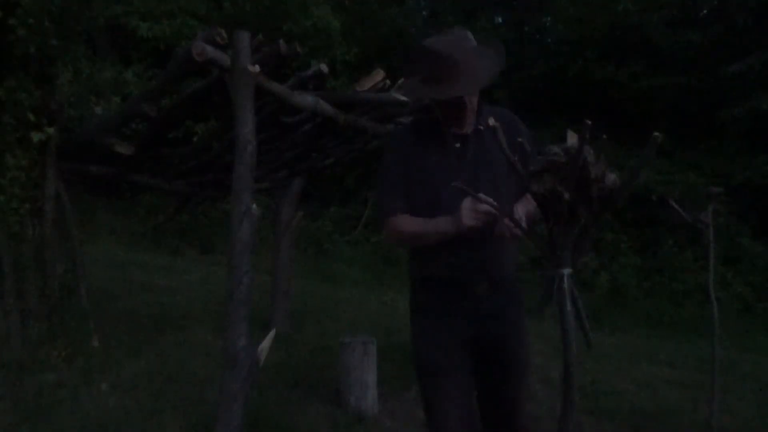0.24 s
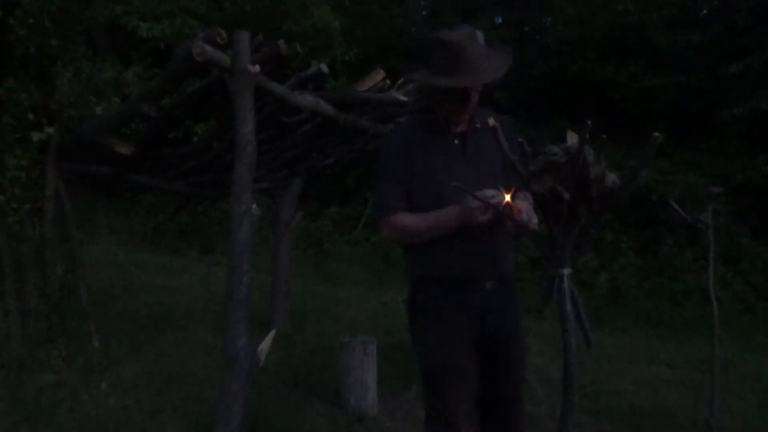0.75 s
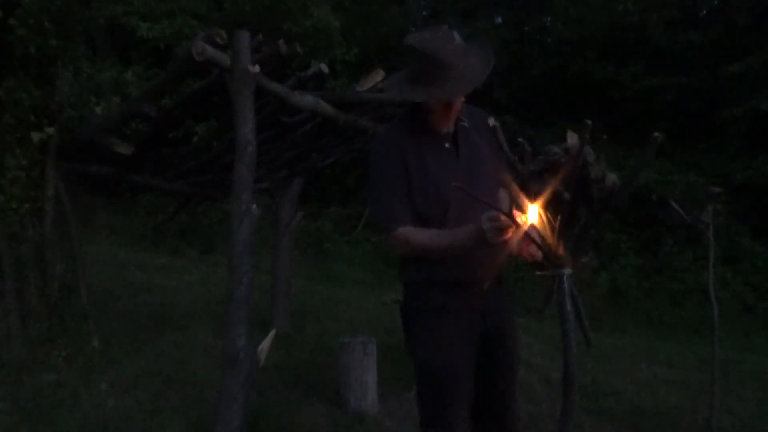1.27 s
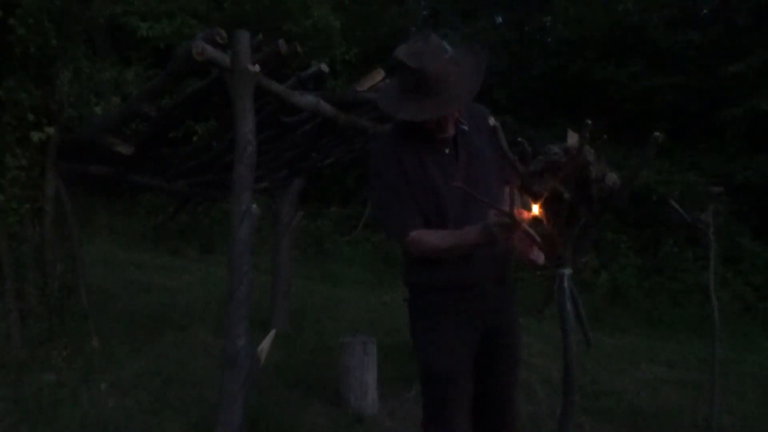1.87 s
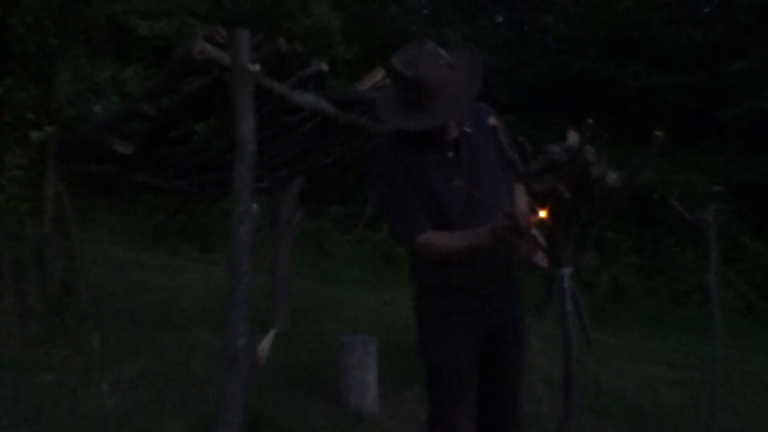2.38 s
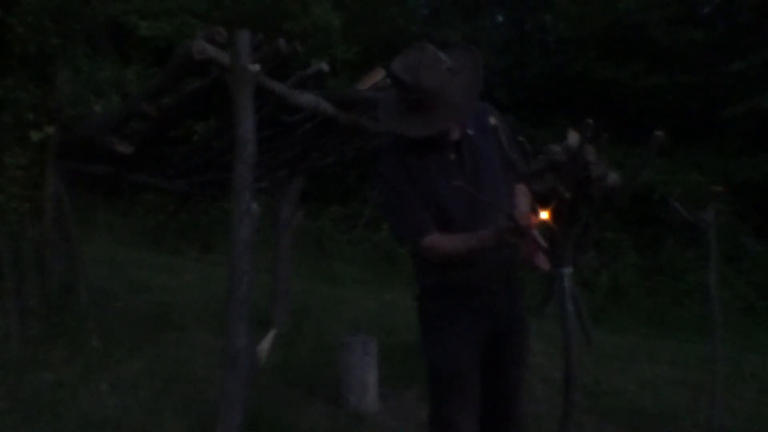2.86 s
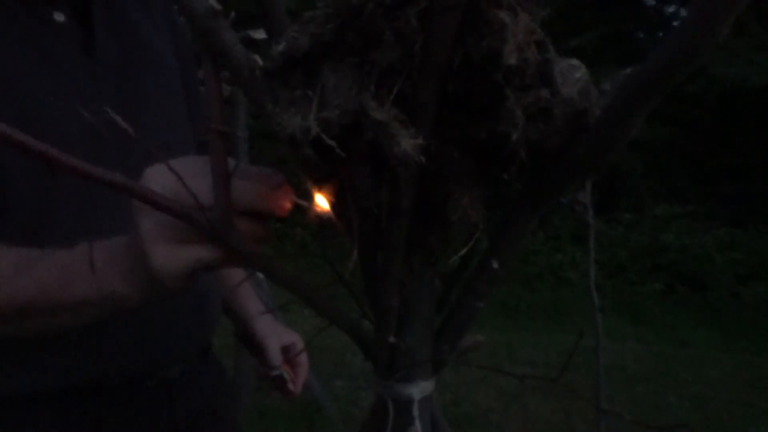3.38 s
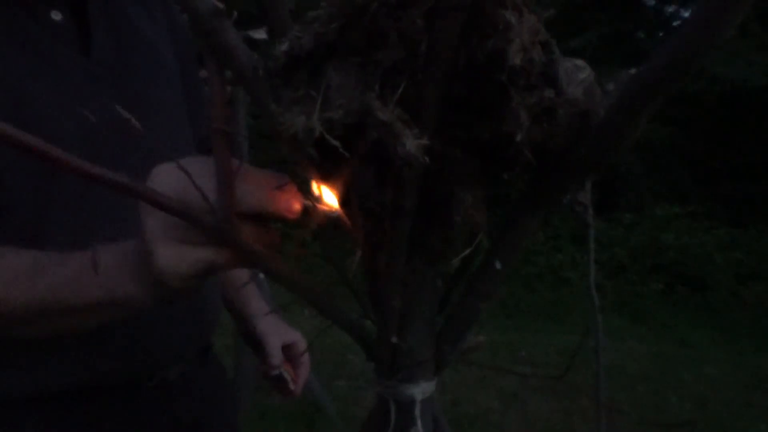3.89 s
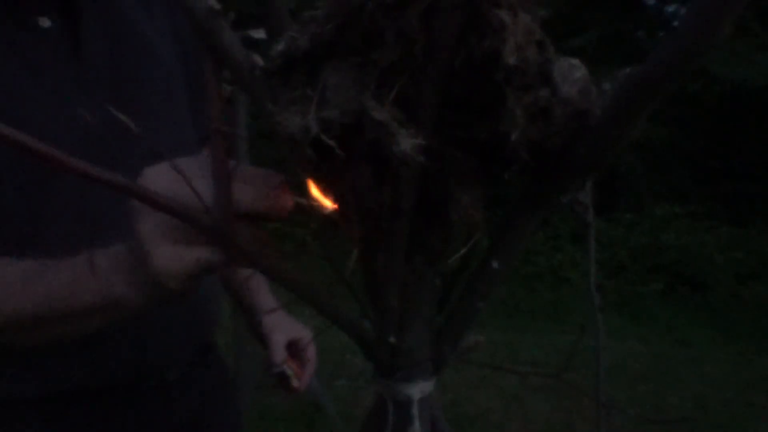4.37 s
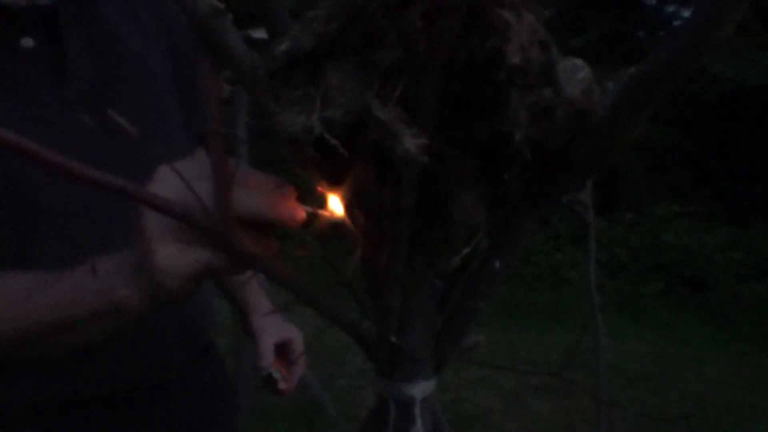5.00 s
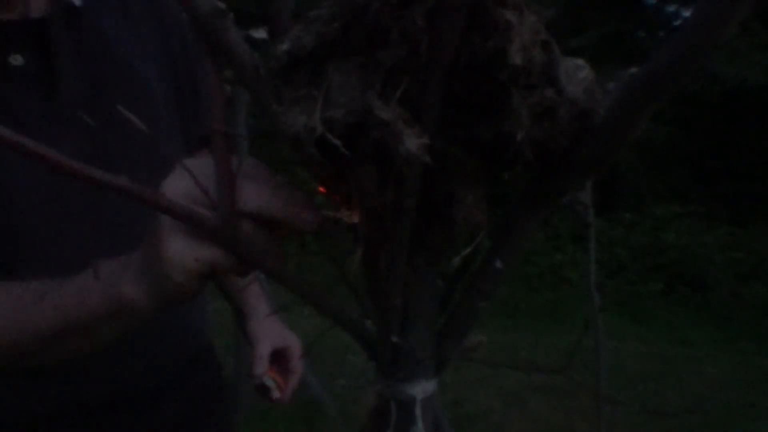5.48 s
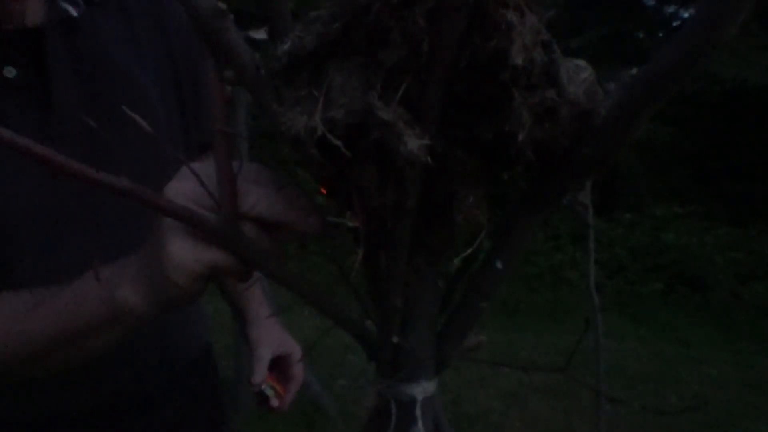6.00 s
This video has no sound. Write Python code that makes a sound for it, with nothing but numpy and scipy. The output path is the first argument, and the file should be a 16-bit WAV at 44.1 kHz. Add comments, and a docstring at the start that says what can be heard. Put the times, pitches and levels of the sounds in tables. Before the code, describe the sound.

A dry, hissing scrape and tiny ticks lead to a quick gritty match strike under a second in, followed by a short fizzing flare and fine crackle. Katydids rasp in quick paired strokes, a cricket chirps and a thin trill hangs very high. Near four seconds, sharp bright twig snaps come in two clusters. Distant birds call faintly over soft traffic and leaf hush. Close handling sounds sit slightly left, insects around.

```python
"""Dusk in a wooded garden, over a hush of far traffic and leaves (shaped noise) with wavering narrow bands.
A match scrapes, catches and flares (gritty noise, bursts ringing a box); dry twigs tick, snap and scuff (pulses
and rubs in resonances). Katydids rasp in paired strokes (tooth clicks in wing resonances), a meadow insect trills
high (beating tones), a tree cricket chirps (tone pulses), something ticks evenly (struck resonances) and far
birds call (gliding tones smeared by trees); a far engine drones very faintly (low narrow-band noise)."""
import sys
import numpy as np
from scipy import signal
from scipy.fft import rfft, irfft
from scipy.io import wavfile
from scipy.ndimage import uniform_filter1d

SR = 44100
rng = np.random.default_rng(int(sys.argv[2]) if len(sys.argv) > 2 else 0)


def log_audio(samples):
    """Write samples as a 16-bit WAV file to the path given in sys.argv[1]."""
    # one column per channel
    frames = np.atleast_2d(samples).T
    # limit to full scale, then quantise
    limited = np.clip(frames, -1, 1)
    pcm = np.round(limited * 32767).astype(np.int16)
    wavfile.write(sys.argv[1], SR, pcm)


N = 275625
T = np.arange(N) / SR

# slow swell of the distant traffic: time_s, swell_db
HUSH_SWELL = [(0, 3.5), (1.5, 2.5), (2.9, 2.5), (3.05, 3.5), (4.5, 3.5), (5.5, 2.5), (6.25, 3)]


def undb(db):
    """Amplitude ratio: 20 dB is a factor of ten."""
    return 10 ** (np.asarray(db) / 20)


def unit(x):
    """Normalization to an RMS of 1."""
    return x / np.sqrt(np.mean(x ** 2))


def curve(rows):
    """Linear interpolation of (time, value) rows at every sample."""
    return np.interp(T, *np.transpose(rows))


def decay(t, t60):
    """Exponential decay: the level falls 60 dB in t60 seconds."""
    return np.exp(-np.log(1000) * t / t60)


def band(x, hz, width):
    """Two-pole resonance with a gain of 1 at its centre."""
    return signal.lfilter(*signal.iirpeak(hz, hz / width, fs=SR), x)


def highpass(x, order, hz):
    """Butterworth high-pass: the bass below the corner is attenuated."""
    return signal.sosfilt(signal.butter(order, hz, "high", fs=SR, output="sos"), x)


def on_hz(rows):
    """Spectral interpolation: a table read on a log-frequency axis at every Fourier bin."""
    hz, value = np.transpose(rows)
    return np.interp(np.log(np.fft.rfftfreq(N, 1 / SR) + 1), np.log(hz), value)


def walk(rate):
    """Random modulation: levels held for 1 / rate seconds, smoothed twice, with a spread near 1."""
    hold = int(SR / rate)
    steps = np.repeat(rng.standard_normal(N // hold + 1), hold)
    return 1.3 * uniform_filter1d(uniform_filter1d(steps, hold), hold)[:N]


def pan(x, db):
    """Interchannel level difference, left minus right, fading above 5 kHz so that the top stays central."""
    pair = x * undb(np.array([[db], [-db]]) / 2)
    side = signal.lfilter(*signal.butter(1, 5000, fs=SR), pair[0] - pair[1]) / 2
    return pair.mean(axis=0) + np.array([side, -side])


def add(out, s, x):
    """Superposition: a sound is summed into the output from time s on."""
    i = int(s * SR)
    out[..., i:i + x.shape[-1]] += x[..., :N - i]


def spread(x, share):
    """Decorrelation by a 9 ms reflection that has opposite signs in the two channels."""
    late = share * np.roll(x, 397)
    return np.array([x + late, x - late])


def echo(x, lag, share):
    """Comb filtering: one close echo with a moving lag sweeps the colour of the sound."""
    return (x + share * np.interp(T - lag, T, x)) / np.hypot(1, share)


def hush():
    """Diffuse noise field: partly coherent between channels, with a slow swell of the traffic below 1.5 kHz."""
    # noise spectrum: frequency_hz, relative_db (per Hz)
    hush_colour = [(25, -33), (76, -18.5), (149, -22), (255, -9), (500, -3.5), (837, -1), (980, -2.5),
                   (1200, -0.5), (1500, -5), (2820, -5.5), (5850, -12.5), (7800, -13), (9520, -5),
                   (12100, -17.5), (15600, -17.5), (16100, -58)]
    # left-right likeness: frequency_hz, correlation (0 to 1)
    likeness = [(60, 0.88), (300, 0.85), (640, 0.65), (1400, 0.18), (3100, 0.16), (6800, 0.71), (15000, 1)]
    # channel balance: frequency_hz, left_minus_right_db
    lean_rows = [(100, 0), (400, -0.5), (1300, -2.5), (2400, 1), (8000, 0)]
    base_db = -59.5  # before the swells

    like = np.clip(on_hz(likeness), 0, .99)
    colour = undb(on_hz(hush_colour))
    mid, side = (rfft(rng.standard_normal(N)) * colour for _ in range(2))
    common, opposed = mid * np.sqrt(1 + like), side * np.sqrt(1 - like)
    lean = undb(on_hz(lean_rows) / 2)
    left = irfft((common + opposed) * lean, N)
    right = irfft((common - opposed) / lean, N)
    pair = unit(np.array([left, right])) * undb(base_db)

    traffic = signal.sosfilt(signal.butter(2, 1500, fs=SR, output="sos"), pair)
    traffic_gain = undb(curve(HUSH_SWELL) + 0.087 * walk(2.58))
    return pair * undb(0.19 * walk(12.0)) + traffic * (traffic_gain - 1)


def whirr():
    """Narrow-band noise: two bands waver and swell with the traffic, independent left and right."""
    # bands in the hush: centre_hz, width_hz (of each of two passes), level_db (before the swell)
    whirr_bands = [(950, 150, -74), (1170, 90, -78)]
    out = 0
    for hz, width, db in whirr_bands:
        noise = band(band(rng.standard_normal((2, N)), hz, width), hz, width)
        out = out + unit(noise) * undb(db + 2.5 * curve(HUSH_SWELL) + 1.5 * walk(6))
    return out


def hiss():
    """Friction and flare as broadband noise: grainy, coloured, and comb filtered by an echo off the hand."""
    # scraping, flare of the match, and brush against the twigs, each a list of: time_s, level_db
    hiss_levels = [
        [(0, -48), (.11, -58.5), (.17, -63), (.37, -56), (.53, -54.5), (.58, -59.5), (.65, -65)],
        [(.71, -57), (.80, -55), (.95, -60), (1.25, -64), (1.6, -66)],
        [(4.43, -61), (4.53, -69)],
    ]
    # noise spectrum: frequency_hz, relative_db (per Hz)
    hiss_colour = [(900, -11), (1700, 3.5), (3580, 6), (8590, 7.5), (13800, 2.5), (15600, -1), (16100, -42)]
    # echo off the hand as it draws away: time_s, lag_s, share (of the direct amplitude)
    hand = [(.72, .0006, 0), (.78, .0008, .45), (.95, .0011, .4), (1.1, .0013, 0)]

    gain = sum(undb(np.interp(T, *np.transpose(rows), left=-120, right=-120)) for rows in hiss_levels)
    grains = rng.standard_normal(N) * undb(2.0 * walk(400))
    noise = unit(irfft(rfft(grains) * undb(on_hz(hiss_colour)), N))
    time, lags, shares = np.transpose(hand)
    lag, share = np.interp(T, time, lags), np.interp(T, time, shares)
    return pan(spread(echo(noise, lag, share) * uniform_filter1d(gain, 300), 0.28), -2.0)


def crackle():
    """Poisson-like impulses: faint ticks at random instants excite two broad resonances."""
    # density of the faint ticks: time_s, rate_per_s
    crackle_rate = [(.74, 15), (1.15, 37), (1.22, 190), (1.42, 120), (1.47, 30), (1.58, 30), (1.62, .5),
                    (3.2, .5), (3.4, 4), (4.4, 4), (4.5, 0)]
    hits = rng.random(N) < curve(crackle_rate) / SR
    scatter_db = 2.4 * np.minimum(rng.standard_normal(N), 1.5)
    faint = hits * undb(-47 + scatter_db)
    return pan(3 * band(band(faint, 3100, 3200), 2900, 5900), -24.5)


def ticks():
    """Brittle fracture: a breaking fibre gives one sharp push, broad in frequency, and a brief crackly tail."""
    # twig and ember ticks: start_s, peak_db (before panning), centre_hz, left_minus_right_db
    tick_rows = [(0.0804, -35, 5900, -9), (0.1914, -35.5, 8700, -12), (0.199, -36, 10200, 9),
                 (1.1602, -42, 5100, -1.2), (1.211, -40, 4670, -3), (1.2337, -34.5, 3230, 8),
                 (1.2372, -37, 2940, 2.5), (1.248, -38, 4160, -6), (1.2788, -37, 5470, 1),
                 (1.3052, -39, 5000, -1.1), (1.313, -42, 5270, -0.6), (1.331, -36, 5000, -1),
                 (1.3722, -40, 5300, -5), (1.3873, -45, 5000, -1.5), (1.408, -45, 4660, 1),
                 (1.4413, -38, 5300, 2), (1.4792, -37, 6000, -0.6), (1.4882, -35, 5600, -7),
                 (1.5122, -34, 5900, -3.5), (1.528, -33, 5740, -1.1), (1.5442, -31, 6260, -9),
                 (1.549, -34, 5400, -1.2), (1.554, -42, 5500, -1.2), (1.573, -35.5, 6900, 1),
                 (3.2603, -39.5, 6500, 0), (3.566, -43, 4200, 0), (3.4132, -42, 5100, 2.5),
                 (3.488, -38, 7100, -5), (3.8026, -20, 7900, 7), (3.8671, -37, 7850, 2.1),
                 (3.9136, -24.5, 7000, 7), (3.922, -31, 6150, 2.5), (3.9553, -17, 8360, 9),
                 (3.961, -31, 7000, -1), (3.9651, -23.5, 8800, -7), (3.9714, -32, 6800, -10),
                 (3.9766, -24, 9200, 13), (4.0935, -36, 6000, 8), (4.2332, -20.5, 8200, 7.5),
                 (4.2418, -30, 6650, -11), (4.2606, -28.5, 7900, 11), (4.2696, -36, 7800, 7),
                 (4.2921, -24, 8100, 7), (5.097, -39, 5600, 1.8), (5.525, -43, 4300, 0)]
    out, t = np.zeros((2, N)), T[:500]
    for s, db, hz, pan_db in tick_rows:
        noise = rng.standard_normal(len(t))
        push = .16 * noise * np.exp(-t / .0003) + .012 * noise * np.exp(-t / .002)
        push[0] = 1
        click = band(push, min(hz, 15000), 1.14 * hz)
        # soft breaks lack the top
        click = signal.lfilter(*signal.butter(2, min(1.7 * hz, 20000), fs=SR), click)
        click = click - .9 * band(click, 10500, 1300)  # a dip from the nearest reflection
        add(out, s - 2 / SR, pan(undb(db) * click / np.abs(click).max(), pan_db))
    return out


def scuffs():
    """Modal excitation: fingers and match rub a dry twig, and each touch favours other modes."""
    # rubs on the twig: time_s, peak_db (before spreading and panning), rise_s, t60_s
    scuff_rows = [(.225, -44, 0.00046, 0.013), (0.8606, -40.5, 0.0011, 0.018), (.889, -45, .002, 0.026),
                  (3.0537, -37.5, 0.0025, 0.028), (3.7105, -24, 0.00025, 0.012), (3.7136, -40, 0.0012, .04),
                  (4.4573, -41, 0.0022, 0.016), (4.466, -45.5, 0.014, .11), (4.515, -51, .004, .04)]
    # modes of the twig: centre_hz, width_hz, relative_db
    twig = [(4770, 1200, 9), (5630, 1100, -5), (6330, 560, -9), (2930, 2100, -7), (8300, 860, -5),
            (1820, 400, -24)]
    mode_scatter_db, lead_s = 2.5, .02

    out, t = np.zeros(N), T[:5000] - lead_s
    for s, db, rise, t60 in scuff_rows:
        env = np.where(t < 0, np.exp(-(t / rise) ** 2), decay(t, t60))
        rub = rng.standard_normal(len(t)) * env
        ring = 0
        for hz, width, mode_db in twig:
            own_db = mode_db + mode_scatter_db * rng.standard_normal()
            ring = ring + undb(own_db) * band(rub, hz, width)
        add(out, s - lead_s, undb(db) * ring / np.abs(ring).max())
    return pan(spread(out, 0.18), -3.5)


def strike():
    """Stick-slip friction: the match head catches repeatedly, each burst of grit ringing the box."""
    # match head catching on the striker: start_s, level_db (before a 10.5 dB cut), t60_s, tilt_db_per_octave
    catches = [(.6908, -9, .005, 5), (.6932, -17, .01, 1), (.6943, -12, .008, -1.5), (.6975, -17, .025, 0),
               (.6988, -8, .02, .5), (.7034, -10, .009, -2.5), (.7050, -10, .012, -4),
               (.7066, -22, .016, -4), (.7090, -34, .11, -2.5), (.7205, -40, .055, -3)]
    # resonances of the matchbox: centre_hz, width_hz, relative_db
    matchbox = [(2700, 490, 17), (5350, 1300, 16.5), (8620, 1100, 21), (13700, 4600, 10), (1230, 540, -2)]
    # light knocks of the box: start_s, level_db (before its second resonance), centre_hz, t60_s
    knocks = [(.7557, -35, 900, .012), (.756, -45, 3100, .012), (.7603, -42, 750, .016)]

    grit = rng.standard_normal(N) * undb(1.5 * walk(2000))
    grit[[int(s * SR) + 1 for s, *_ in catches]] = 3.  # the first bite is hard
    rings = np.array([undb(db) * band(grit, hz, width) for hz, width, db in matchbox])
    rings = rings / np.std(rings.sum(axis=0))
    octaves = np.log2(np.transpose(matchbox)[0] / 7000)  # the tilt pivots at 7 kHz
    out, t = np.zeros(N), T[:4000]
    for s, db, t60, tilt in catches:
        i = int(s * SR)
        body = undb(tilt * octaves) @ rings[:, i:i + len(t)]
        add(out, s, undb(db - 10.5) * body * decay(t, t60))
    out = highpass(out, 3, 520)  # the bass is cut by the microphone

    for s, db, hz, t60 in knocks:
        thud = unit(band(rng.standard_normal(2000), hz, 7.1 * hz)) * decay(T[:2000], t60)
        add(out, s, undb(db) * band(thud, hz, 2 * hz))
    return pan(spread(highpass(out, 4, 230), 0.18), -4.0)


def katydids():
    """Stridulation: a file dragged over a scraper makes dense uneven tooth clicks in the wing resonances."""
    # wing resonances: centre_hz, width_hz (widened 1.5 times in each of two passes), relative_db
    wings = [(11600, 1250, -0.3), (10250, 750, -6), (12700, 1000, -9), (9500, 900, -11)]
    # phrases of near and far singers in turn: first_s, last_s, first_period_s, main_db, low_db, top_db,
    # lag_s_per_khz (by distance below the main resonance)
    phrases = [(.760, 2.36, .1235, -53.5, -53.5, -53.5, -.004),
               (2.421, 2.95, .127, -64.5, -58.5, -62, .005), (3.020, 4.3, .134, -53.5, -58, -58, .008),
               (4.405, 5.93, .1304, -67, -60, -68, .005), (6.052, 6.2, .129, -56.5, -59.5, -60, .008)]
    stroke_s, tail_s, lead_s = 0.016, 0.054, .03
    tooth_rate = 1100  # mean clicks per second
    slowing_s, pair_gap_s = .0007, .044  # the period grows along a phrase; two strokes to a beat
    warm_up_db, warm_up_s, scatter_db = -10, .13, .7  # the opening phrase swells in

    t = np.arange(int(.14 * SR)) / SR - lead_s
    stroke = np.exp(-(t / stroke_s) ** 2)
    stroke = np.maximum(stroke, 0.43 * np.exp(-t / tail_s) * (t > 0))  # leaves scatter a tail
    envs, beat = np.zeros((len(wings), N)), np.arange(16)
    opening_s, main_hz = phrases[0][0], wings[0][0]
    for first, last, period, main_db, low_db, top_db, lag in phrases:
        beats = first + period * beat + slowing_s * beat ** 2
        for start in beats[beats < last]:
            for s in (start, start + pair_gap_s):
                db = scatter_db * rng.standard_normal() + warm_up_db * np.exp(-(s - opening_s) / warm_up_s)
                # the stroke sweeps across the resonances
                for env, (hz, *_), part_db in zip(envs, wings, (main_db, low_db, top_db, low_db)):
                    add(env, s - lead_s + lag * (main_hz - hz) / 1000, undb(db + part_db) * stroke)

    out = 0
    for (hz, width, db), env in zip(wings, envs):
        teeth = (rng.random(N) < tooth_rate / SR) * rng.standard_normal(N)
        rasp = unit(teeth) + .8 * rng.standard_normal(N)
        ringing = band(band(rasp, hz, 1.5 * width), hz, 1.5 * width)
        out = out + undb(db) * env * unit(ringing)
    leaf_lag = .0016 + .00006 * walk(3.3)  # seconds: echo off a swaying leaf
    return spread(echo(out, leaf_lag, 0.63) * undb(-1.0), 0.17)


def trill():
    """Beating: a sharp wing tone and one upper neighbour interfere into a fast pulse train."""
    # high trill: time_s, level_db, upper_relative_db
    trill_rows = [(1.2, -95, -2), (1.28, -72, -2), (2.9, -72, -3), (3.1, -70.5, -11), (4.3, -71, -12),
                  (6.25, -71, -12)]
    tone_hz, pulse_rate_hz = 13118, 129  # mean values; both wander
    throb_from_s, throb_to_s, throb_period_s = 4.545, 5.3, .0795  # short gaps break the trill
    gap_s, gap_db = .011, -10

    s, level_db, upper_db = np.transpose(trill_rows)
    phase = 2 * np.pi * np.cumsum(tone_hz + 3 * walk(41)) / SR
    beat = 2 * np.pi * np.cumsum(pulse_rate_hz + 5 * walk(20)) / SR
    lower = undb(2 * walk(25)) * np.sin(phase)
    upper = undb(np.interp(T, s, upper_db) + 3 * walk(25)) * np.sin(phase + beat)
    gaps = np.arange(throb_from_s, throb_to_s, throb_period_s)
    gaps_db = sum(gap_db * np.exp(-((T - gap) / gap_s) ** 2) for gap in gaps)
    return spread((lower + upper) * undb(np.interp(T, s, level_db) + gaps_db), 0.017)


def tree_cricket():
    """Amplitude-modulated pure tone: two short Gaussian pulses make a chirp."""
    # chirps, now and then of a second singer in between: onset_s, level_db (before tilt, spread and pan)
    chirps = [(1.2331, -53), (1.3244, -55), (1.4815, -56), (1.6062, -57), (1.6262, -58.5), (1.6896, -58.5),
              (1.7699, -57.5), (1.8492, -61), (1.9315, -59), (2.0088, -57.5), (2.0906, -59), (2.166, -57),
              (2.246, -59), (2.4299, -63), (2.6264, -59), (2.9507, -61), (2.9806, -61.5), (3.0565, -55.5),
              (3.1393, -55), (3.2191, -61), (3.2585, -62), (3.2964, -60), (3.430, -60), (3.4989, -59),
              (3.582, -60), (3.6601, -61), (3.7414, -62), (3.8611, -60), (4.0193, -56), (4.0795, -56),
              (4.0974, -61), (4.1869, -62), (4.31, -60.5), (5.423, -64), (5.444, -62), (5.5009, -58),
              (5.5787, -58), (5.659, -59.5), (5.7389, -58.5), (5.818, -57.5), (5.897, -58.5), (5.979, -56),
              (6.0616, -60), (6.1384, -58), (6.2208, -61)]
    tone_hz, pulse_gap_s, pulse_s = 2805, 0.0077, 0.003  # tone and gap vary from chirp to chirp
    middle_s, lead_s = .007, .02  # the middle of a chirp follows its onset

    out, t = np.zeros(N), np.arange(int(.04 * SR)) / SR - lead_s
    for s, db in chirps:
        detune, gap, tilt = rng.standard_normal(3)
        half = pulse_gap_s / 2 * (1 + .1 * gap)
        env = sum(undb(k * 2.5 * tilt) * np.exp(-((t - k * half) / pulse_s) ** 2) for k in (-1, 1))
        tone = np.sin(2 * np.pi * tone_hz * (1 + .005 * detune) * t)
        add(out, s + middle_s - lead_s, undb(db) * env * tone)
    return pan(spread(out, 0.12), 2.4)


def ticking():
    """Damped resonance: brief grainy bursts excite two modes, evenly spaced, strong and weak in turn."""
    # runs of ticks: first_s, last_s, peak_db (of the strong ticks)
    runs = [(2.323, 2.98, -52.5), (3.117, 4.3, -53), (4.316, 5.42, -50.5), (5.434, 6.25, -65)]
    # the two resonances: centre_hz, width_hz, relative_db
    tick_modes = [(2800, 350, 3), (3830, 850, 1.5)]
    tick_gap_s, weak_db, t60_s = .04, -5, .013

    out, t = np.zeros((2, N)), T[:900]
    for first, last, db in runs:
        for k, s in enumerate(np.arange(first, last, tick_gap_s)):
            push = rng.standard_normal(len(t)) * decay(t, t60_s)
            ring = sum(undb(mode_db) * band(push, hz, width) for hz, width, mode_db in tick_modes)
            add(out, s - .002, undb(db + weak_db * (k % 2)) * ring / np.abs(ring).max())
    return out


def birds():
    """Frequency modulation: wavering notes of far birds, and a few pitched ticks, smeared by reverberation."""
    # far whistles, and a few very short pitched ticks:
    # start_s, length_s, start_hz, end_hz, level_db (before waver and trees)
    whistles = [(3.24, .06, 2080, 1950, -68), (3.395, .085, 2610, 2520, -65.5),
                (3.465, .07, 2490, 2290, -63.5), (3.525, .05, 2200, 2030, -67.5),
                (3.77, .09, 2190, 2010, -66), (3.845, .05, 2050, 2160, -67), (3.90, .08, 2060, 2070, -66.5),
                (3.407, .01, 4700, 4300, -64), (3.553, .014, 3600, 3550, -67),
                (3.63, .016, 3550, 3480, -63.5), (4.445, .03, 1720, 1850, -59),
                (5.467, .01, 4400, 4000, -62), (5.805, .07, 2075, 2070, -66.5)]
    # two-voiced calls that scoop up, then hold: start_s, length_s, second_swell_after_s, lower_db, upper_db
    calls = [(2.68, .33, .1, -72, -74), (3.74, .16, .1, -80, -70), (3.926, .19, .105, -56.5, -65),
             (4.133, .19, .09, -61, -67), (4.328, .19, .065, -62, -63.5), (4.562, .16, .108, -56.5, -62.5),
             (4.82, .2, .055, -64, -64)]
    # the lower and upper voice: held_hz, scoop_hz, hold_relative_to_accent_db
    voices = [(4640, 190, -14.5), (6540, 520, -8)]
    scoop_s, accent_at_s, accent_s = .014, .025, .024
    swell_s, swell_db = .012, 6  # the hold of the lower voice swells once more
    out, waver_hz = np.zeros(N), 45 * walk(260)

    def sing(s, hz, env):
        """Phase integration: a sine follows its wavering frequency."""
        i = int(s * SR)
        roughness = .7 + (hz / 5900) ** 8 - .5 * (hz > 4000)  # the highest voice is the roughest
        wavering = hz + waver_hz[i:i + len(hz)] * roughness
        add(out, s, env * np.sin(2 * np.pi * np.cumsum(wavering) / SR))

    for s, length, hz0, hz1, db in whistles:
        u = np.linspace(0, 1, int(length * SR))
        sing(s, hz0 + (hz1 - hz0) * u, undb(db) * np.sin(np.pi * u) ** .6)

    for s, length, again, *levels_db in calls:
        t = T[:int(length * SR)]
        after = 1 - np.exp(-((t - accent_at_s) / accent_s) ** 4)  # 0 on the accent, 1 in the hold
        fade = np.sin(np.pi * t / length) ** .2
        swell = swell_db * np.exp(-((t - again) / swell_s) ** 2)
        for (hz, scoop, hold_db), db in zip(voices, levels_db):
            env = undb(db + hold_db * after + swell * (hz < 5000)) * fade
            sing(s, hz - scoop * np.exp(-t / scoop_s), env)

    out = out * undb(2.4 * walk(80))  # broken loudness
    t = T[:SR]
    trees = rng.standard_normal((2, len(t))) * decay(t, .8) * undb(-37.5)
    return undb(0.5) * out + np.array([signal.fftconvolve(out, tail)[:N] for tail in trees])


def far_engine():
    """Low-frequency resonance: noise passed twice through a narrow band makes a very faint drone."""
    # far engine: time_s, level_db
    drone = [(0, -99), (2.9, -99), (3.1, -91), (4, -111), (5, -99), (5.8, -93), (6.1, -86), (6.25, -87)]
    hum = band(band(rng.standard_normal(N), 71.4, 9.7), 71.4, 9.7)
    return unit(hum) * undb(curve(drone))


def scene():
    """Linear superposition of all the sources."""
    near = hiss() + crackle() + ticks() + scuffs() + strike()
    animals = katydids() + trill() + tree_cricket() + birds()
    return hush() + whirr() + near + animals + ticking() + far_engine()


def record(dry):
    """Band limiting: a steep elliptic low-pass cuts the top above 16450 Hz."""
    return signal.sosfilt(signal.ellip(8, .2, 70, 16450, fs=SR, output="sos"), dry)


dry = scene()
out = record(dry)
log_audio(out)
```